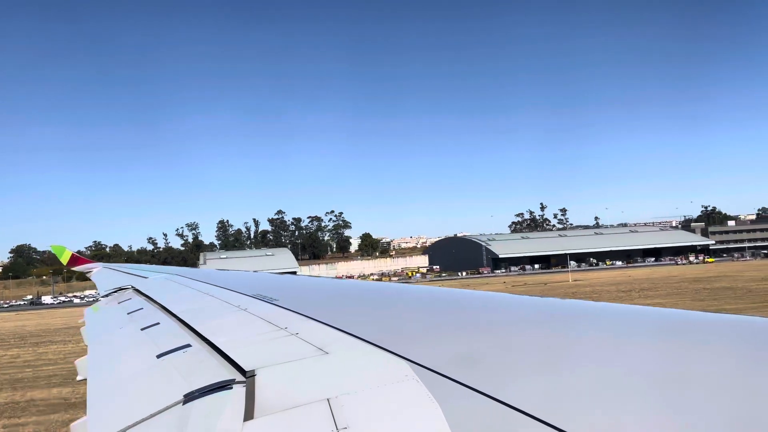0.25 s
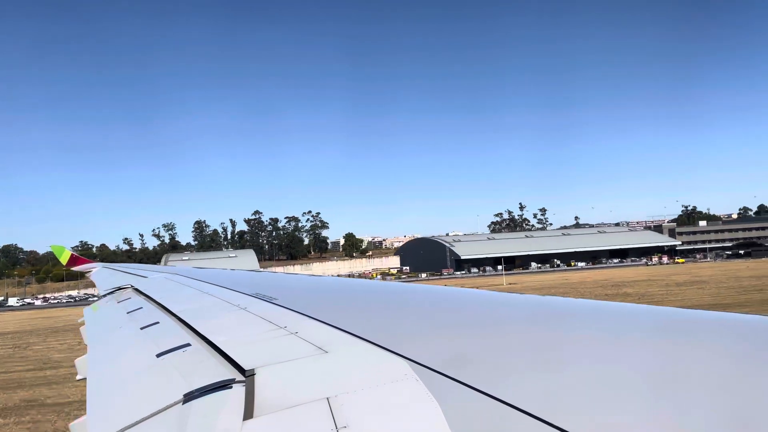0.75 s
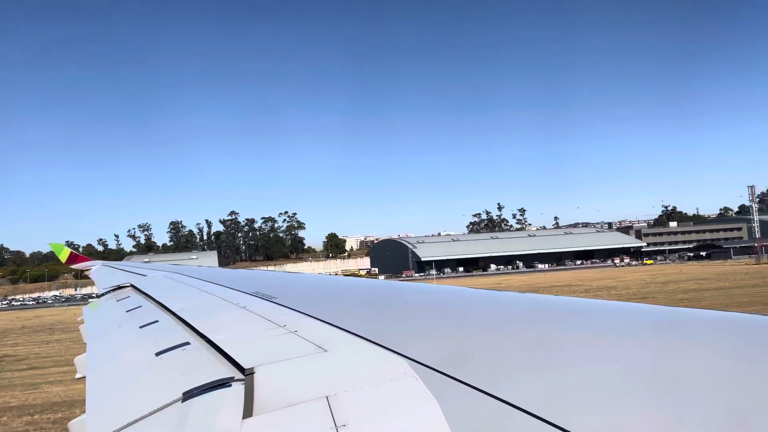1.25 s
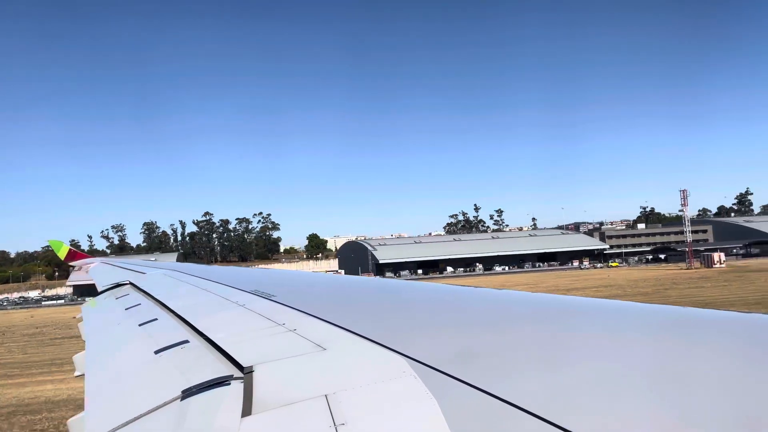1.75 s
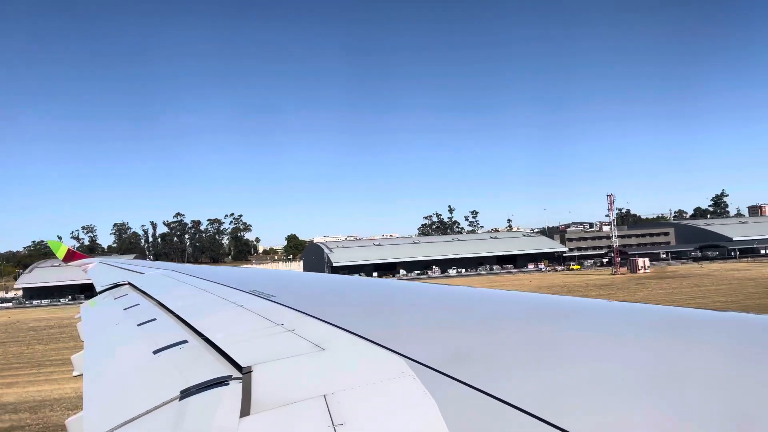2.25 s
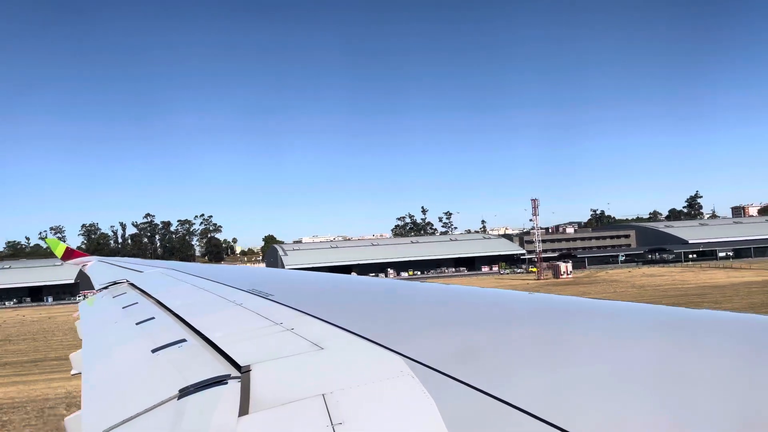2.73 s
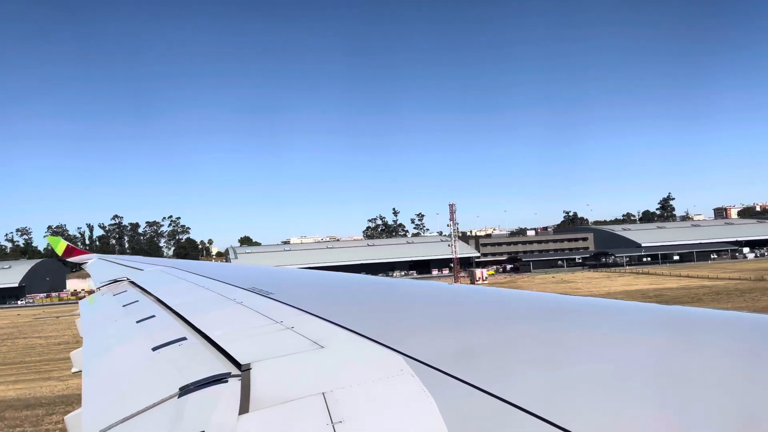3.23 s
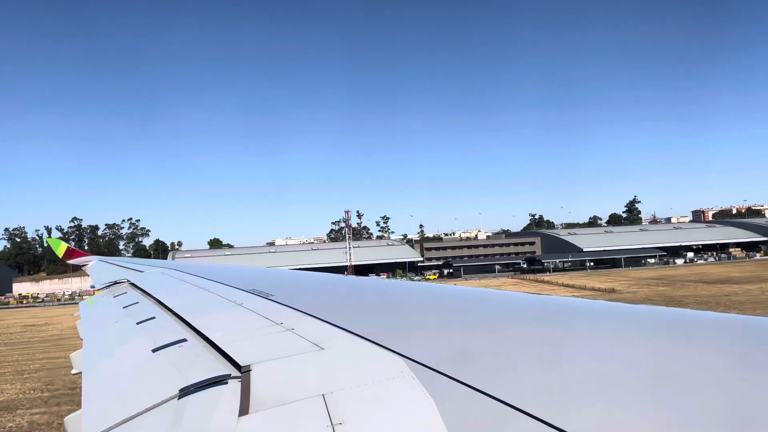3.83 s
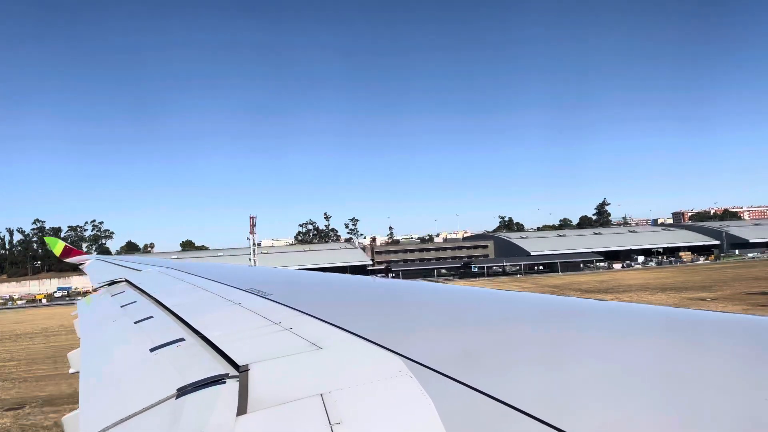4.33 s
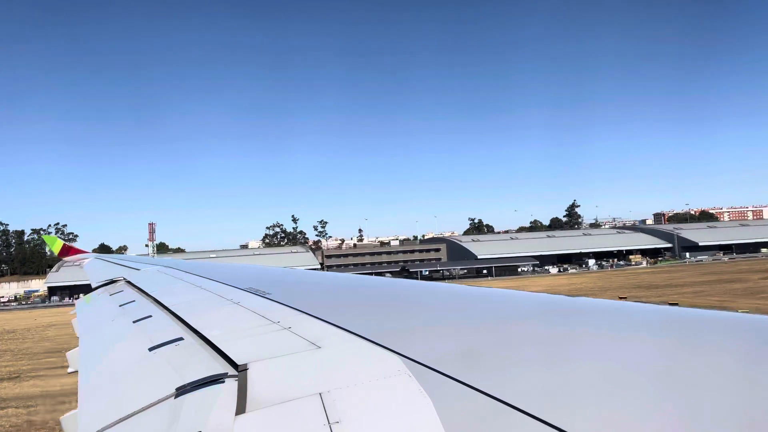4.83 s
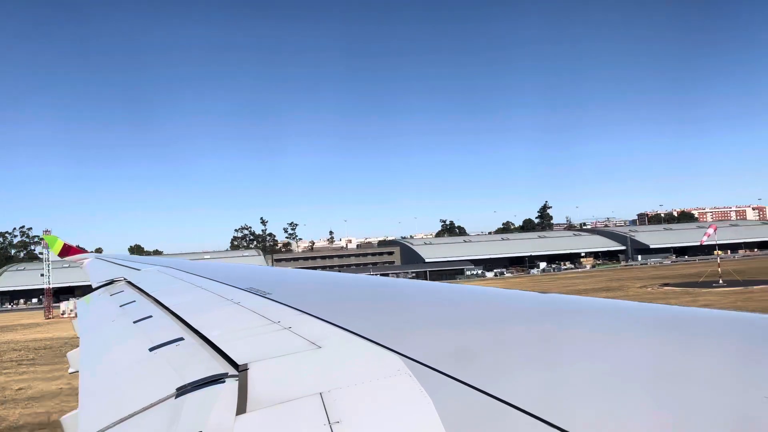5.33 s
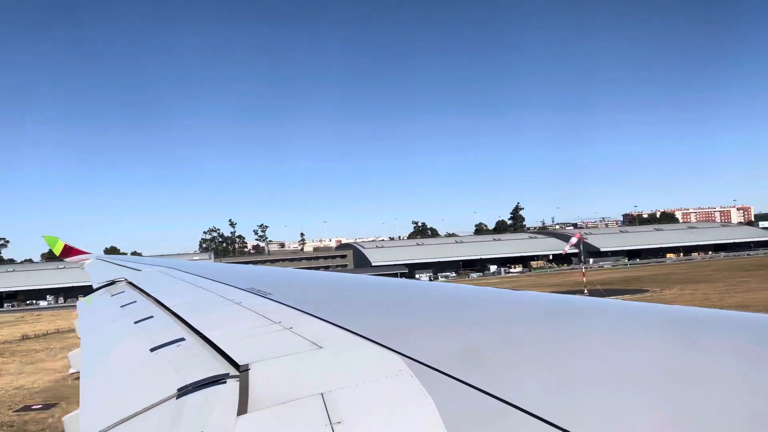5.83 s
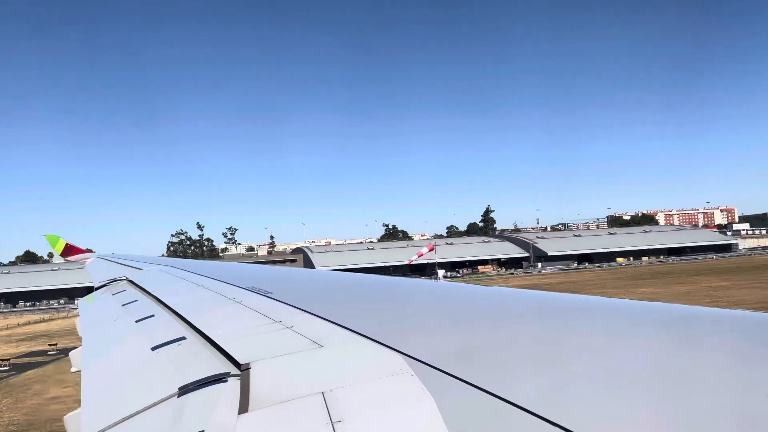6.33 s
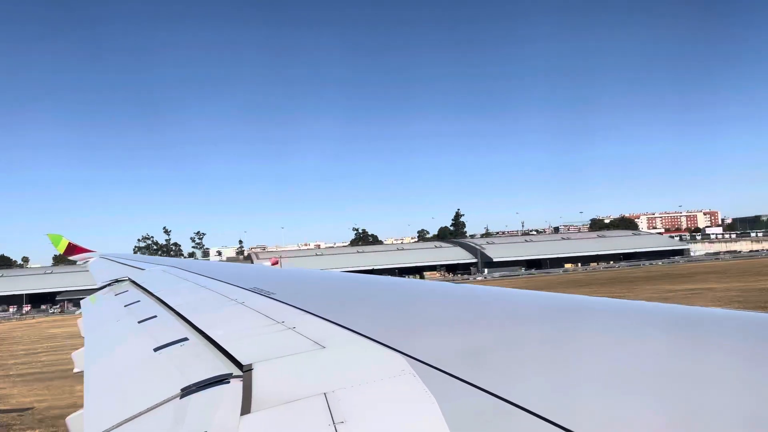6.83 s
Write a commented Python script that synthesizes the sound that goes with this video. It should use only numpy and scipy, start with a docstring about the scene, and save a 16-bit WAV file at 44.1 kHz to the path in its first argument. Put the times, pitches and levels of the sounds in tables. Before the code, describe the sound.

An airliner accelerates down the runway, heard inside the cabin with a close handheld microphone. Thick, nearly overloaded low rumble dominates throughout, with muffled roar, wavering low drone and only a thin hiss of air. Bumps bring soft hollow knocks from the wall panel and tiny scratchy rubs of plastic. Sharp little ticks are sparse at first, then cluster around the middle and near the end. The engine neither builds nor fades.

```python
"""Aircraft cabin, window seat over the wing, on the takeoff roll: rumble and roar at constant thrust.
Filtered noise gives the jet, wheels, air and heaving airframe; wavering sines give the engine tones.
Bumps excite the decaying modes of a wall panel; a plastic case at the microphones rubs (crackling
hiss) and ticks (impulses into its modes). A limiter holds down the peaks of this very loud sound."""
import sys
import numpy as np
from scipy import signal
from scipy.fft import rfft, irfft
from scipy.io import wavfile
from scipy.ndimage import uniform_filter1d, minimum_filter1d

SR = 44100
rng = np.random.default_rng(int(sys.argv[2]) if len(sys.argv) > 2 else 0)


def store_pcm(level_fs):
    """Save levels as 16-bit WAV."""
    pcm = np.round(np.clip(level_fs, -1, 1) * 32767).astype(np.int16)
    wavfile.write(sys.argv[1], SR, np.atleast_2d(pcm).T)


N = 312228
TIME = np.arange(N) / SR  # t/s
BINS = np.maximum(np.arange(N // 2 + 1) * SR / N, 1)  # f/Hz of the spectrum, at least 1

# Sound field at the two microphones: [f/Hz, left minus right level/dB]
FIELD_BALANCE = [(50, -1), (120, 3), (300, 1), (470, 5.5), (700, 0.5), (1050, -1), (1550, 5.5), (2100, 1),
                 (3000, 6.5), (5900, 8), (7200, 2.5), (10000, 0)]
# Likeness of the two channels: [f/Hz, share 0-1]
FIELD_LIKENESS = [(60, .997), (100, .98), (160, .94), (300, .85), (410, .88), (520, .35), (620, .45),
                  (800, .15), (1500, .6), (2300, .15), (8000, .2), (9500, .95)]
# Phase by which left leads right: [f/Hz, phase/rad]
FIELD_LEAD = [(25, .05), (60, .09), (110, .22), (250, .28), (400, .22), (500, -1), (620, -2.4), (800, -2.4),
              (1100, -1.2), (1600, -.6), (3000, 0)]

# Air rushing along the skin and through the vents: [f/Hz, relative density level/dB per Hz]
AIR_COLOUR = [(1500, -11), (2500, -4), (3200, 2), (4000, -3.5), (5300, -4), (5850, 1), (6500, -4.5),
              (7100, -14.5), (9000, -11), (13000, -25)]

# Rubbing of the case: [f/Hz, relative density level/dB per Hz]
RUB_COLOUR = [(1500, -12), (2100, -2.5), (2850, 7), (4200, -2.5), (5300, -0.5), (5800, 3.5), (6500, 1),
              (7100, -5.5), (8000, 1.5), (8700, -3), (11200, -2.5), (13000, -11.5)]
# Rubbing at the two microphones: [f/Hz, left minus right level/dB]
RUB_BALANCE = [(2000, -1), (2850, 7.5), (4200, 0.5), (5800, 11), (7100, 2), (8000, 5), (10000, -0.5)]
# Slides of the case on the stronger jolts, before the common gain:
# [t/s halfway up the rise, length/s, level/dB, extra level/dB in the lower part of the hiss]
RUBS = [(0.041, 0.078, -43, 1), (0.153, 0.047, -47, 4), (0.25, 0.035, -46.5, 0.5), (0.293, 0.036, -46.5, 3),
        (1.006, 0.078, -48, 3.5), (1.13, 0.029, -44.5, 2), (1.278, 0.044, -42.5, 1),
        (1.36, 0.045, -48.5, 3.5), (1.446, 0.042, -44.5, -2), (1.798, 0.042, -47, 5),
        (1.987, 0.032, -49, 2), (2.076, 0.043, -49, -2), (2.146, 0.049, -49, 3), (2.282, 0.032, -46, -4),
        (2.362, 0.02, -46.5, -1), (2.42, 0.029, -42, 0.5), (2.488, 0.039, -40.5, -2),
        (2.57, 0.035, -49.5, 7), (2.951, 0.054, -45.5, -4), (3.07, 0.032, -45.5, 0),
        (3.258, 0.019, -41, -2), (3.388, 0.012, -45, 0), (3.517, 0.045, -47, -1), (3.668, 0.041, -48, -6),
        (3.903, 0.038, -49.5, 0), (4.064, 0.052, -51, 11), (4.192, 0.051, -40.5, 1.5),
        (4.276, 0.051, -45.5, 1), (4.516, 0.012, -51, 0), (4.585, 0.035, -44.5, 1.5),
        (4.683, 0.044, -44, 2), (4.723, 0.054, -43, 1), (4.966, 0.024, -47, -3), (5.129, 0.034, -46.5, -2),
        (5.238, 0.064, -45, -3), (5.354, 0.025, -52, -1), (5.643, 0.031, -43, 0), (5.91, 0.064, -52, 0),
        (6.078, 0.019, -45.5, 2), (6.177, 0.062, -44.5, 0.5), (6.45, 0.02, -48, 8),
        (6.517, 0.056, -46.5, 4.5), (6.588, 0.004, -38, 2), (6.62, 0.005, -40, 5), (6.757, 0.011, -42.5, 4),
        (7.035, 0.056, -51, 2)]

# Airframe heaving on its wheels: [f/Hz, relative density level/dB per Hz]
HEAVE_COLOUR = [(14, 4.5), (25, -3), (36, -8.5), (42, 4.5)]
# Dips in the runway that rock it harder: [t/s, width/s, added level/dB]
SWAYS = [(0.75, .06, -29), (1.04, 0.088, -23), (1.37, .05, -28), (2.0, 0.043, -35), (2.25, .1, -34),
         (3.02, 0.052, -19), (3.73, .07, -26), (4.17, 0.087, -28), (4.65, .08, -22), (4.87, .06, -19),
         (5.15, .08, -28), (5.42, .06, -34)]

# Snaps of the case, before scatter: [t/s, level/dB of the crack, level/dB of the knock in its body]
TICKS = [(1.277, -36, -16), (1.9086, -39, -18), (2.9555, -24, -4), (4.3852, -39, -19), (4.42, -36.5, -12),
         (4.4948, -31.5, -12), (4.6053, -27.5, -4), (4.6376, -32.5, -8), (4.6454, -29.5, -7),
         (4.8622, -24.5, -1.5), (5.6356, -27, -5), (5.8556, -35, -11), (5.9523, -29, -7),
         (6.4524, -23.5, -2), (6.6276, -21, -4), (6.7098, -41, -12)]
# Modes of the case, relative to the snap: [f/Hz, left level/dB, right level/dB, t60/s]
CASE_MODES = [(470, -8, -20, .028), (735, -10.5, -15.5, .017), (925, -9.5, -14.5, .012),
              (1130, -11, -18, .012), (1490, -16, -25, .014), (1780, -19, -29, .009),
              (2200, -17, -23, .006), (3100, -3.5, -9.5, .0048), (5000, -4, -7.5, .0034),
              (6700, -2.5, -11.5, .0026), (9200, 1.5, 1.5, .002), (11300, 4, 4, .0017)]

# Knocks of the wall panel, loud and soft, before the common gain: [t/s at the crest, level/dB]
KNOCKS = [(0.169, -11.5), (0.187, -12), (0.567, -18), (1.297, -17), (1.389, -14.5), (1.512, -14),
          (1.667, -8.5), (2.046, -12), (2.076, -14), (2.183, -13.5), (2.388, -10), (2.51, -10.5),
          (2.717, -10.5), (2.803, -9.5), (4.103, -11.5), (4.299, -9), (4.457, -10.5), (4.473, -12.5),
          (4.759, -16), (4.828, -12), (4.871, -14), (4.908, -15), (5.484, -7.5), (5.749, -15), (5.784, -20),
          (5.956, -12), (6.171, -15.5), (6.657, -20)]
# Modes of the wall panel, before the common ring gain: [f/Hz, level/dB, t60/s]
PANEL_MODES = [(328, -3, 0.087), (368, -6, .12), (411, 0, .14)]

# Shaft, fan and turbine tones, before the common gain:
# [f/Hz, left level/dB, right level/dB, share 0-1 of the fan swell]
TONES = [(56, -24, -24.5, 0), (80.5, -23.5, -24, 0), (278.5, -36, -36, 0), (404, -33, -38, 0),
         (823.6, -48.5, -40.5, 1), (1105.4, -53, -43, 0), (1648, -57, -66, 0), (4124, -69, -77, 0),
         (5857, -66, -71, 0)]
# Swell of the fan tone, scaled by that share: [t/s, level/dB]
FAN_SWELL = [(0, 0), (2.9, -2), (3.4, 4), (4.0, 6), (4.25, 1), (4.8, 7.5), (5.1, 3.5), (6.0, 1.5),
             (7, -0.5)]

# Jet roar through the wall: [f/Hz, relative density level/dB per Hz]
ROAR_COLOUR = [(250, -3.5), (305, 0.5), (330, 9), (390, 6.5), (414, 10.5), (458, 7.5), (478, 10), (520, 8),
               (650, 2), (900, 0.5), (1200, -2.5), (1600, -6), (1800, -13), (2300, -20.5), (4000, -34)]

# Body-borne rumble: [f/Hz, relative density level/dB per Hz]
RUMBLE_COLOUR = [(48, -12), (54, -2.5), (72, -2.5), (108, 1), (138, -2.5), (152, -6.5), (168, -3.5),
                 (195, -10.5), (218, -6.5), (255, -17), (305, -20.5), (410, -19), (650, -39.5)]
# Boom, the loudest part of the rumble, relative: [t/s, level/dB]
BOOM_LEVEL = [(0, -1), (0.25, 1.5), (0.4, -2.5), (0.6, -0.5), (0.92, -5), (1.13, 4), (1.45, -2), (1.7, 2),
              (1.87, -0.5), (2.07, -2), (2.25, -1.5), (2.75, 1), (2.95, -1.5), (3.1, 1), (3.68, 0.5),
              (3.85, -4), (4.0, -1.5), (4.5, 1.5), (4.72, -1), (4.85, 2), (5.1, 1), (5.32, 2.5), (5.5, 1.5),
              (6.25, 1.5), (6.38, -1.5), (6.56, 0.5), (6.72, 1), (7.08, 0.5)]
# Brief sags of the rumble: [t/s, depth/dB]
SAGS = [(0.86, 6), (1.49, 3.5), (2.235, 9), (2.97, 4.5), (3.9, 7), (5.01, 8), (5.17, 4.5), (5.885, 8),
        (6.75, 7)]

# rms levels/dB; those of rumble, roar and air stand for constant thrust
AIR_DB, HEAVE_DB, ROAR_DB, RUMBLE_DB = -50.5, -42.5, -25, -7.5
BOOM_HZ, BOOM_OCTAVES = 100, 0.43  # centre, half width
PANEL_HZ, PANEL_SCATTER_HZ = 382.7, 10
# Further bumps and lesser jolts by chance; levels before the common gains
SOFT_KNOCKS_PER_S, SOFT_KNOCK_DB = 3.5, -20.5
SOFT_RUBS_PER_S, SOFT_RUB_S, SOFT_RUB_DB = 2.5, 0.023, -59.5
CUTOFF_HZ = 15800


def from_db(db):
    """A level in decibels is 20 times the logarithm of the amplitude ratio; this inverts it."""
    return 10 ** (np.asarray(db) / 20)


def rms_one(x):
    """Normalization divides a signal by its root-mean-square value."""
    return x / np.sqrt(np.mean(x ** 2) + 1e-20)


def over_hz(points):
    """Linear interpolation on a logarithmic frequency axis joins (f/Hz, value) points."""
    hz, value = np.transpose(points)
    return np.interp(np.log(BINS), np.log(hz), value)


def drift(rate):
    """Low-passed white noise, of rms 1, is a slow random fluctuation of about `rate` turns a second."""
    spectrum = rfft(rng.standard_normal(N)) / (1 + (BINS / rate) ** 2)
    return rms_one(irfft(spectrum, N))


def noise(colour, balance):
    """Partial coherence: the right channel shares part of the left's shaped noise; joint rms 1."""
    left, other = rfft(rng.standard_normal((2, N)))
    alike = np.clip(over_hz(FIELD_LIKENESS), 0, 1)
    right = alike * left + np.sqrt(1 - alike ** 2) * other
    right = right * np.exp(-1j * over_hz(FIELD_LEAD)) * from_db(-over_hz(balance))
    # steep fall beyond both ends of the colour
    ends = np.minimum(1, np.minimum(BINS / colour[0][0], colour[-1][0] / BINS)) ** 3
    shaped = np.array([left, right]) * from_db(over_hz(colour)) * ends
    return rms_one(irfft(shaped, N))


def ring(force, hz, t60):
    """A damped resonator answers a unit impulse with a decaying sine of initial height 1."""
    r = from_db(-60 / (t60 * SR))  # decay per sample
    w = 2 * np.pi * hz / SR
    return signal.lfilter([0, np.sin(w)], [1, -2 * r * np.cos(w), r * r], force + 1e-18)


def add(track, s, sound):
    """Superposition: a short sound is summed into a track from t = s."""
    start = int(np.clip(s * SR, 0, N - 1))
    track[start:start + len(sound)] += sound[:N - start]


def by_chance(per_s, level_db, spread_db=4.0):
    """Stratified chance places one (t/s, level/dB) event at random in each interval 1 / per_s."""
    chance = rng.random((100, 2))
    times = (np.arange(len(chance)) + chance[:, 0]) / per_s
    levels = level_db + spread_db * (2 * chance[:, 1] - 1)
    return [(s, db) for s, db in zip(times, levels) if s < N / SR]


def swell_at(s, width_s):
    """A Gaussian envelope of height 1 is centred on t = s."""
    return np.exp(-np.minimum(((TIME - s) / width_s) ** 2, 30))


def evened(x, evenness, span_s):
    """Division by a power of the short-time power reduces the random swells of a stereo noise."""
    power = np.mean(x ** 2, axis=0)
    relative = uniform_filter1d(power, int(span_s * SR)) / power.mean()
    return x / relative ** (evenness / 2)


def air():
    """Turbulent flow along the skin and through the vents radiates a broadband hiss."""
    return from_db(AIR_DB) * noise(AIR_COLOUR, FIELD_BALANCE)


def crackle(per_s=260.0, size_db=3.5, grain_s=0.00089, share=.3):
    """Stick-slip: random tiny slips each raise the gain, which decays at once; rms 1."""
    sizes = from_db(size_db * np.minimum(rng.exponential(1, N), 3)) ** 2
    slips = (rng.random(N) < per_s / SR) * sizes
    power = signal.lfilter([1], [1, -np.exp(-1 / (grain_s * SR))], slips + 1e-18)
    return np.sqrt(1 - share + share * power / power.mean())


def case_rubs(gain_db=0.84, rise_s=0.01, fall_s=0.0095, wander_db=3.0, wanders_per_s=30.0,
              faint_db=-61, faint_spread_db=2.0, low_hz=4300.0, high_hz=7300.0):
    """Sliding friction gives crackly hiss in three wandering bands; a faint stirring lies beneath."""
    low_power, high_power = np.zeros(N), np.zeros(N)
    t = np.arange(SR // 4) / SR
    soft = [(s, SOFT_RUB_S, db, 0) for s, db in by_chance(SOFT_RUBS_PER_S, SOFT_RUB_DB)]
    for s, length, level_db, extra_db in RUBS + soft:
        shape = np.minimum(t / rise_s, 1) * np.exp(-np.maximum(t - length, 0) / fall_s)
        start, level_db = s - rise_s / 2, level_db + gain_db
        add(high_power, start, (from_db(level_db) * shape) ** 2)
        add(low_power, start, (from_db(level_db + extra_db) * shape) ** 2)
    stirring = from_db(faint_db + faint_spread_db * np.clip(drift(14), -2, 2))
    hiss = noise(RUB_COLOUR, RUB_BALANCE)
    low, below_top = (irfft(rfft(hiss) / (1 + (BINS / hz) ** 8), N) for hz in (low_hz, high_hz))
    bands = [(low, low_power), (below_top - low, np.sqrt(low_power * high_power)),
             (hiss - below_top, high_power)]
    out = np.zeros((2, N))
    for band, power in bands:
        contact = crackle() * from_db(wander_db * drift(wanders_per_s))
        out += band * np.sqrt(power * contact ** 2 + stirring ** 2)
    return out


def heave(swell_db=1.0, swells_per_s=2.0):
    """Rigid-body motion on an uneven runway: slowly swelling low noise, alike at both microphones."""
    level = from_db(HEAVE_DB + swell_db * drift(swells_per_s))
    level = level + sum(from_db(db) * swell_at(s, width) for s, width, db in SWAYS)
    return level * rms_one(noise(HEAVE_COLOUR, FIELD_BALANCE).mean(axis=0))


def case_ticks(scatter_db=.7, body_hz=2500.0):
    """Impulse excitation: a snap cracks in the high modes and knocks hollowly in the low ones."""
    s, crack_db, knock_db = np.transpose(TICKS)
    at = np.clip(s * SR, 0, N - 1).astype(int)
    chance = rng.standard_normal((len(s), len(CASE_MODES)))
    out = np.zeros((2, N))
    for k, (hz, left_db, right_db, t60) in enumerate(CASE_MODES):
        force = np.zeros(N)
        level_db = knock_db if hz < body_hz else crack_db
        force[at] = from_db(level_db + scatter_db * chance[:, k])
        sign = (-1) ** (k // 2)  # polarity alternates by pairs of modes
        out += sign * ring(force, hz, t60) * from_db([[left_db], [right_db]])
    return out


def panel_knocks(gain_db=0.7, rise_s=0.00616, ring_db=0.5, right_db=-4.0):
    """Modal response: each bump is a soft thud, after which the panel's close modes ring and beat."""
    thuds, t = np.zeros(N), np.arange(SR // 8) / SR
    shape = (t / rise_s * np.exp(1 - t / rise_s)) ** 2
    knocks = KNOCKS + by_chance(SOFT_KNOCKS_PER_S, SOFT_KNOCK_DB)
    for (s, level_db), (turn, detune) in zip(knocks, rng.random((200, 2))):
        hz = PANEL_HZ + PANEL_SCATTER_HZ * (2 * detune - 1)
        thud = shape * np.sin(2 * np.pi * (hz * t + turn))
        add(thuds, s - rise_s, from_db(level_db + gain_db) * thud)
    rings = np.zeros(N)
    for hz, db, t60 in PANEL_MODES:
        q = np.pi * hz * t60 / np.log(1000)
        rings += from_db(db + ring_db) * signal.lfilter(*signal.iirpeak(hz, q, fs=SR), thuds)
    return (thuds + rings) * from_db([[0], [right_db]])


def engine_tones(gain_db=-1.15, waver_db=1.7, waver_rad=0.73):
    """Rotating sources: tones follow one shaft speed; turbulence makes each waver in phase and level."""
    turns = np.cumsum(1 + .0008 * drift(2)) / SR
    swell_db = np.interp(TIME, *np.transpose(FAN_SWELL))
    out = np.zeros((2, N))
    for hz, left_db, right_db, share in TONES:
        phase = 2 * np.pi * hz * turns + waver_rad * drift(6.4)
        # less likeness between the channels, more phase drift of their own
        apart = 1 - np.clip(np.interp(hz, BINS, over_hz(FIELD_LIKENESS)), 0, 1)
        level_db = gain_db + share * swell_db + waver_db * drift(2.3)
        for side, side_db in enumerate((left_db, right_db)):
            tone = np.sin(phase + apart * drift(2))
            out[side] += np.sqrt(2) * from_db(side_db + level_db) * tone
    return out


def roar():
    """Turbulent mixing in the jet radiates broadband noise, which the wall dulls."""
    return from_db(ROAR_DB) * noise(ROAR_COLOUR, FIELD_BALANCE)


def rumble(evenness=0.59, span_s=0.08, sag_s=0.014, boom_evenness=0.52, boom_span_s=0.14):
    """Structure-borne sound: exhaust and wheels shake the fuselage, with a surging boom and brief sags."""
    shake = noise(RUMBLE_COLOUR, FIELD_BALANCE)
    boom_band = 1 / (1 + (np.log2(BINS / BOOM_HZ) / BOOM_OCTAVES) ** 8)
    boom = irfft(rfft(shake) * boom_band, N)
    surge = from_db(np.interp(TIME, *np.transpose(BOOM_LEVEL)))
    shake = shake - boom + surge * evened(boom, boom_evenness, boom_span_s)
    sag_db = sum(depth_db * swell_at(s, sag_s) for s, depth_db in SAGS)
    return from_db(RUMBLE_DB - sag_db) * evened(shake, evenness, span_s)


def scene():
    """Superposition of the sources outside (engines, wheels, air) and inside (panel, case)."""
    outside = air() + heave() + engine_tones() + roar() + rumble()
    inside = case_rubs() + case_ticks() + panel_knocks()
    return outside + inside


def limiter(x, ceiling=0.97, ahead_s=0.0053, release_db_per_s=138.5):
    """Look-ahead gain control: gain ducks just ahead of peaks over the ceiling, then recovers quickly."""
    over_db = 20 * np.log10(np.maximum(np.abs(x).max(axis=0) / ceiling, 1))
    # each overshoot decays at the release rate
    release_db = release_db_per_s * TIME
    held_db = np.maximum.accumulate(over_db + release_db) - release_db
    span = max(int(ahead_s * SR), 2)
    gain_db = minimum_filter1d(-held_db, 2 * span)
    return x * from_db(uniform_filter1d(uniform_filter1d(gain_db, span), span))


def record(dry, port_hz=11200.0, port_q=9.2, port_db=6.5, turn_hz=10100.0, turn_q=4.0, top_hz=11970.0):
    """Port resonance lifts the treble, which falls away above; a limiter and a low-pass follow."""
    dry = signal.sosfilt(signal.butter(N=6, Wn=top_hz, fs=SR, output="sos"), dry)
    resonance = signal.lfilter(*signal.iirpeak(port_hz, port_q, fs=SR), dry)
    left, right = dry + (from_db(port_db) - 1) * resonance
    # an all-pass turns the left phase back by a whole cycle around turn_hz
    left = left - 2 * signal.lfilter(*signal.iirpeak(turn_hz, turn_q, fs=SR), left)
    lowpass = signal.ellip(10, .2, 80, CUTOFF_HZ, fs=SR, output="sos")
    fade = np.minimum(np.minimum(TIME, TIME[::-1]) / .004, 1)  # 4 ms at each end
    return signal.sosfilt(lowpass, fade * limiter(np.array([left, right])))


dry = scene()
out = record(dry)
store_pcm(out)
```